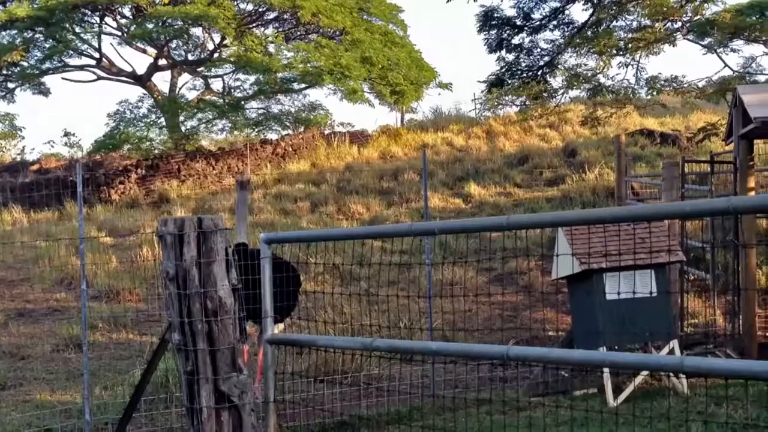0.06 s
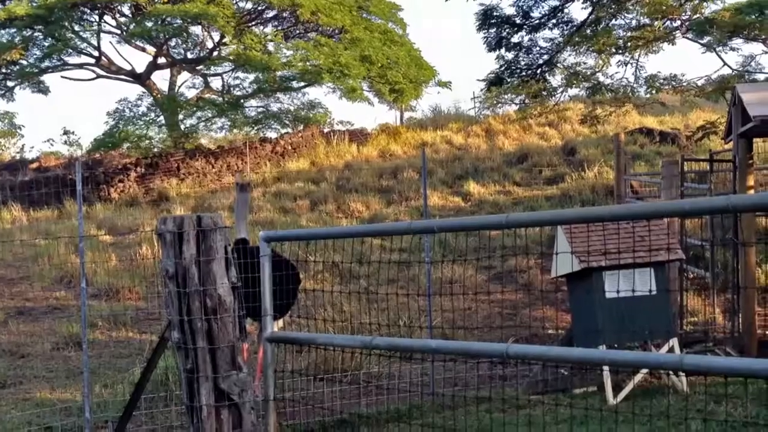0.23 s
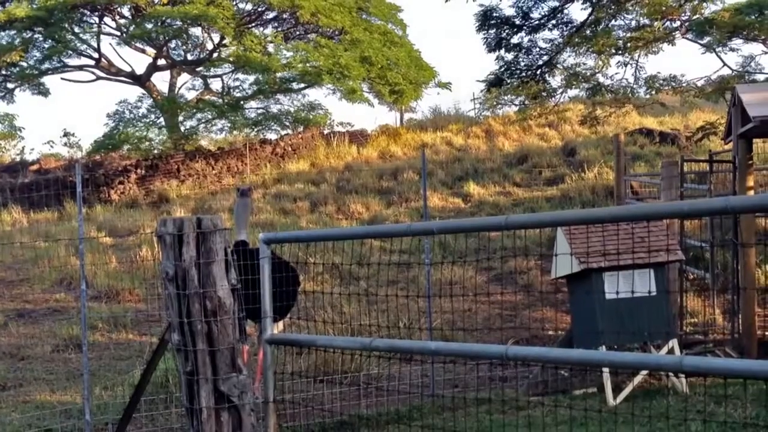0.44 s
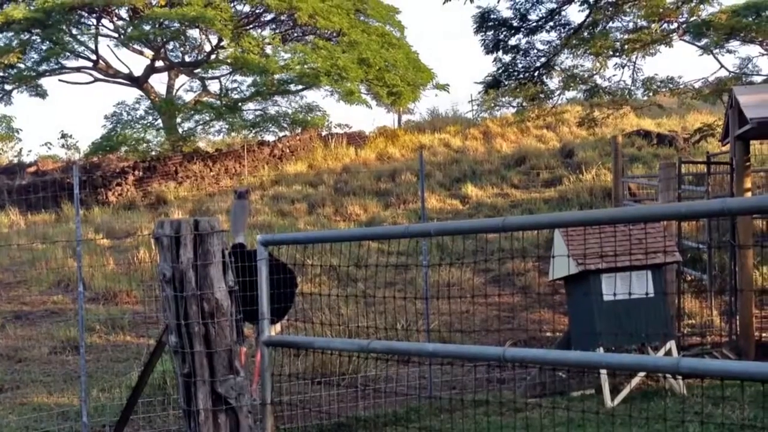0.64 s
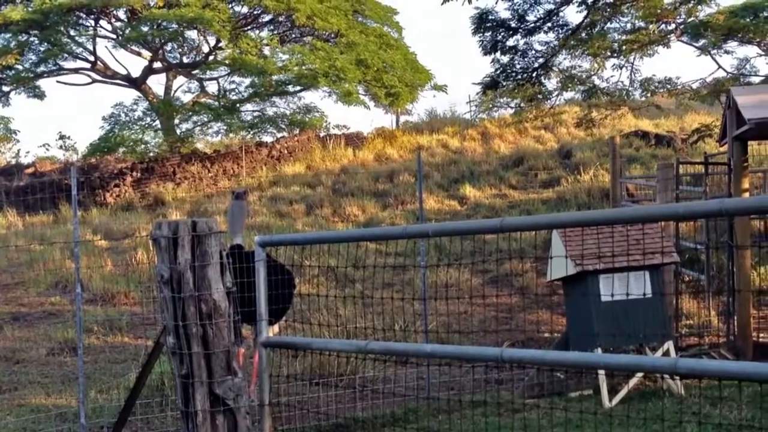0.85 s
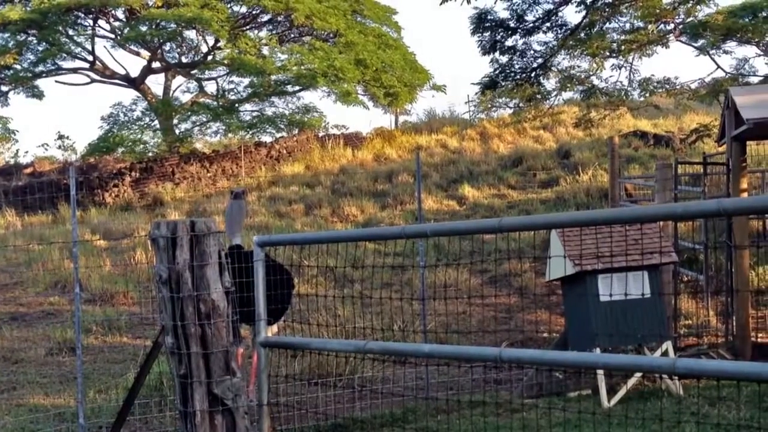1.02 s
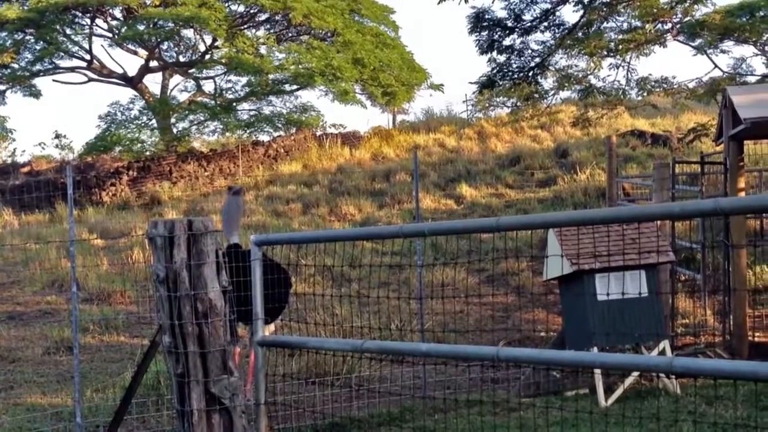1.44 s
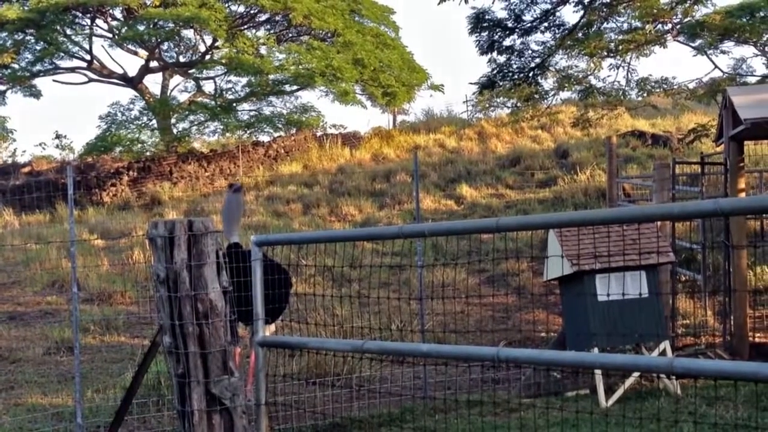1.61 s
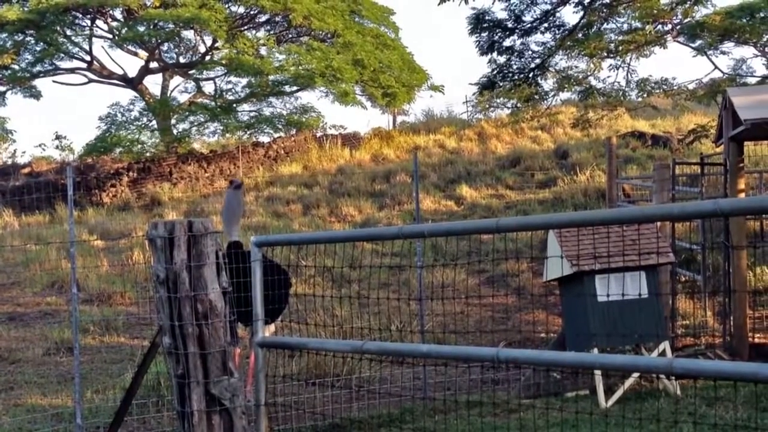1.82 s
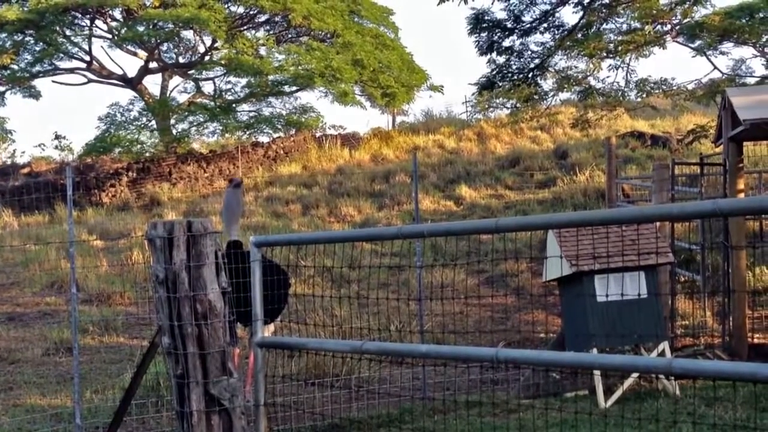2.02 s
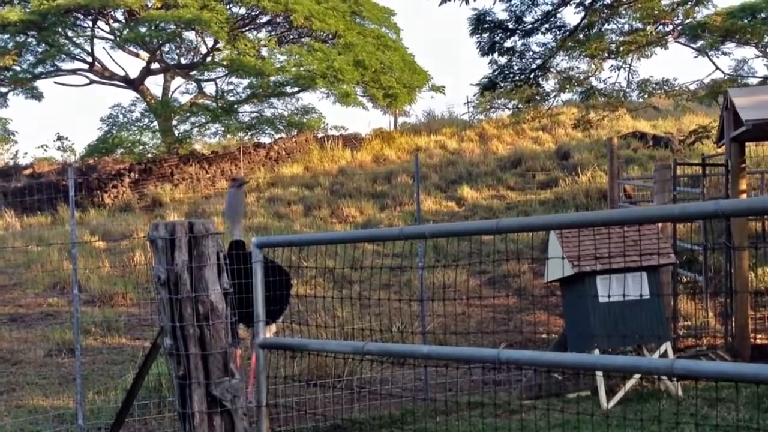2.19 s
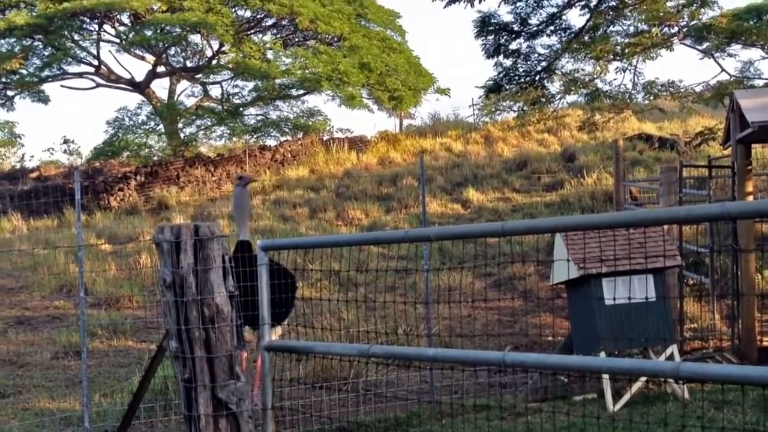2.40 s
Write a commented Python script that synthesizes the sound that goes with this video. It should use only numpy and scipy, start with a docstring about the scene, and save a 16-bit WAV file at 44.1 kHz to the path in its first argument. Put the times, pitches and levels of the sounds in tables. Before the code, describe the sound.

An ostrich gives one deep boom, swelling by 0.3 seconds, fluttering and falling in pitch, then sinking into a slow rattle from 1.1 to 1.7 seconds. A hen's reedy squawk overlaps the first 0.4 seconds. From 0.9 seconds, small birds chirp faintly far off in quiet open air. A faint low cluck at 1.7 seconds leads into a soft, rising hen call lasting until about 2.5 seconds.

```python
"""A hen ends a loud squawk as a male ostrich starts one boom behind a farm gate. His inflated neck rings
near 170 Hz while the voice under it swells, flutters and sinks into a slow rattle, whose overtones pass
through the resonance one after another. Midway, small birds begin to chip far off in the quiet air.
A short low cluck and a softer, drawn-out hen call close the scene."""
import sys
import numpy as np
from scipy import signal
from scipy.fft import rfft, irfft
from scipy.io import wavfile

SR = 44100
rng = np.random.default_rng(int(sys.argv[2]) if len(sys.argv) > 2 else 0)


def master_out(mix):
    """Clip the mix to full scale and print it as 16-bit PCM to the path in sys.argv[1]."""
    frames = np.transpose(np.atleast_2d(mix))
    ceiling = np.clip(frames, -1, 1)
    pcm = np.round(ceiling * 32767).astype(np.int16)
    wavfile.write(sys.argv[1], SR, pcm)


N = 112454


def from_db(db):
    """Decibels to gain."""
    return 10 ** (np.asarray(db) / 20)


def rms_one(x):
    """Scale to unit rms."""
    return x / np.sqrt(np.mean(x ** 2) + 1e-20)


def in_time(rows):
    """Each column of a curve at every sample."""
    time_s, *columns = np.transpose(rows)
    return [np.interp(np.arange(N) / SR, time_s, column) for column in columns]


def gain_at(spectrum, hz):
    """Gain of a spectrum at these frequencies."""
    freq_hz, db = np.transpose(spectrum)
    return from_db(np.interp(np.log(hz + 1), np.log(freq_hz), db))


def gate(rows, fade_s=0.0069):
    """Open from the first to the last point of a curve."""
    t = np.arange(N) / SR
    return np.clip(1 + np.minimum(t - rows[0][0], rows[-1][0] - t) / fade_s, 0, 1)


def drift(rate_hz):
    """Smooth random wander with a spread of 1."""
    pole = np.exp(-40 * np.pi * rate_hz / SR)  # one step every 20 samples
    slow = signal.lfilter([1], [1, -2 * pole, pole * pole], rng.standard_normal(N // 20 + 2002))[2000:]
    return np.interp(np.arange(N) / 20, np.arange(len(slow)), rms_one(slow))


def noise(spectrum):
    """Coloured noise of unit rms."""
    white = rfft(rng.standard_normal(N))
    return rms_one(irfft(white * gain_at(spectrum, np.fft.rfftfreq(N, 1 / SR)), N))


def phase_of(hz):
    """Running phase of a frequency curve."""
    return 2 * np.pi * np.cumsum(hz) / SR


def voice(hz, throat, flicker_db, harmonics, lift_db=lambda hz: 0):
    """Harmonics of a pitch, weighted by the throat as they move through it; level evened to 1."""
    phase, tone, power = phase_of(hz), 0, 0
    for k in range(1, harmonics + 1):
        gain = gain_at(throat, k * hz) * from_db(flicker_db * drift(34) + lift_db(k * hz))
        tone += gain * np.cos(k * phase + rng.uniform(0, 2 * np.pi))
        power += gain ** 2 / 2
    return tone / np.sqrt(power)


def ostrich():
    """A falling, fluttering voice rings in the inflated neck; faint overtones and turbulence ride on it."""
    # the voice from opening grunt through boom to rattle: time_s, pitch_hz
    grunt_pitch = [(0.14, 90.9), (0.192, 98.8)]
    boom_pitch = [(0.208, 156.5), (0.236, 160), (0.25, 171.7), (0.296, 184.4), (0.362, 193.4),
                  (0.426, 185.3), (0.548, 171.6), (0.64, 164.3), (0.802, 156.3), (0.902, 138.7),
                  (0.956, 129.9), (1.0, 124.7), (1.05, 109)]
    rattle_pitch = [(1.1, 104.6), (1.2, 93.9), (1.302, 81.82), (1.412, 68.9), (1.486, 62.08), (1.7, 44.47)]
    # envelopes of boom, rattle and overtones: time_s, level_db
    boom_level = [(0.13, -67), (0.16, -33.5), (0.298, -5), (0.33, -11.5), (0.52, -10.5), (0.554, -18.5),
                  (0.588, -6.5), (0.732, -6.5), (0.826, -10), (0.872, -29.5), (0.894, -19), (0.922, -33.5),
                  (1.004, -32), (1.04, -48)]
    rattle_level = [(1.07, -36.5), (1.112, -34.5), (1.134, -30), (1.24, -19.5), (1.262, -28.5),
                    (1.294, -21), (1.33, -29.5), (1.416, -36), (1.512, -27), (1.54, -42), (1.582, -35.5),
                    (1.626, -45.5), (1.676, -43.5), (1.72, -64)]
    overtone_level = [(0.15, -48), (0.26, -35.5), (0.38, -37), (0.55, -38), (0.72, -35.5), (0.9, -36),
                      (1.03, -49), (1.15, -49), (1.27, -46.5), (1.42, -50), (1.7, -72)]
    # tremolo of the voice: time_s, rate_hz, depth (0-1)
    flutter_curve = [(0.2, 43, 0.14), (0.36, 73, 0.28), (0.45, 40.6, 0.36), (0.55, 30, 0.14),
                     (0.65, 33.6, 0.27), (0.77, 66.3, 0.36), (1.0, 47, .15), (1.7, 44, 0.04)]
    # the neck's main resonance and the weaker ones that colour the overtones: freq_hz, gain_db
    neck = [(45, -61), (80, 1), (105, -16.5), (135, -7), (170, 18.5), (200, 2), (225, -7.5), (255, -51),
            (320, -61), (500, -79)]
    windpipe = [(200, -60), (225, -41), (258, 6.5), (320, 8.5), (375, -2.5), (420, -13), (490, -4.5),
                (550, -17), (630, 0.5), (740, -10), (800, -34), (890, -16), (970, -17), (1040, -23.5),
                (1130, -19), (1350, -39.5), (1750, -28), (2500, -43.5)]
    # turbulent air in the neck: freq_hz, density_db
    turbulence = [(40, -20), (80, -17.5), (120, 6), (190, 10), (260, -4.5), (400, -16), (700, -27.5),
                  (1100, -31), (1500, -46), (3000, -56.5)]
    jitter, shimmer = 0.002, 0.044
    rasp_db, rasp_follow = -28.5, 0.34  # the rasp follows a share of the envelope in dB
    neck_band_hz = [106, 229]  # the neck radiates little outside this band

    hz, = in_time([*grunt_pitch, *boom_pitch, *rattle_pitch])
    hz = hz * (1 + jitter * drift(27))
    envelope = [*boom_level, *rattle_level]
    db, = in_time(envelope)
    flutter_hz, depth = in_time(flutter_curve)
    flutter_phase = phase_of(flutter_hz * (1 + 0.06 * drift(13)))
    flutter = 1 + depth * np.sin(flutter_phase) + shimmer * drift(17)
    boom = from_db(db) * flutter * voice(hz, neck, flicker_db=0.5, harmonics=6)
    boom = signal.sosfiltfilt(signal.butter(4, neck_band_hz, "band", fs=SR, output="sos"), boom)
    overtones = from_db(in_time(overtone_level)[0]) * voice(hz, windpipe, flicker_db=1.2, harmonics=12)
    rasp = noise(turbulence) * from_db(rasp_db + rasp_follow * db)
    return gate(envelope, fade_s=0.032) * (boom + overtones + rasp)


def hen(call, throat, lift_db=lambda hz: 0):
    """A reedy tone that cracks now and then, with a puff of rasp on every cycle."""
    # voice cracks, strong and weak cycles alternating: centre_s, length_s, depth (0-1)
    cracks = [(0.267, .04, .2), (2.324, 0.014, .55), (2.358, 0.023, 0.64)]
    # rasp against the tone: time_s, level_db
    hoarseness = [(0, -9), (0.015, -10), (0.03, -24), (0.15, -25), (0.18, -18), (0.21, -25), (0.275, -17),
                  (0.32, -23), (0.36, -22), (1.85, -26), (2.0, -28), (2.25, -24), (2.33, -26), (2.5, -26)]
    # colour of the throat's rasp: freq_hz, density_db
    rasp_colour = [(250, -23.5), (500, -11), (800, -6), (1150, 9), (1600, -5.5), (2000, -19), (2500, -30.5),
                   (2950, 1.5), (3450, 2.5), (4200, -12.5), (5000, -25), (5700, -19), (6800, -10.5),
                   (8000, -36.5), (10000, -26.5), (13000, -44)]
    jitter, shimmer = 0.0035, 0.06

    hz, db = in_time(call)
    hz = hz * (1 + jitter * drift(61))
    t, phase = np.arange(N) / SR, phase_of(hz)
    crack = sum(depth * np.exp(-(2 * (t - centre_s) / length_s) ** 2)
                for centre_s, length_s, depth in cracks)
    tone = voice(hz, throat, flicker_db=2.38, harmonics=19, lift_db=lift_db)
    tone = tone * (1 + shimmer * drift(32) + crack * np.cos(phase / 2))
    rasp = from_db(in_time(hoarseness)[0]) * noise(rasp_colour) * (1 + np.cos(phase))
    cry = gate(call) * from_db(db) * (tone + rasp)
    return signal.sosfilt(signal.butter(4, 300, "high", fs=SR, output="sos"), cry)


def squawk():
    """A loud open-beaked cry whose resonances swell in turn as the beak moves."""
    # contour of the cry: time_s, pitch_hz, level_db
    call = [(0.0, 562, -24.5), (0.062, 577, -26), (0.1, 558.5, -25), (0.122, 558.3, -25.5),
            (0.17, 593.6, -22), (0.18, 602, -23.5), (0.19, 575, -25), (0.212, 593.7, -20.5),
            (0.226, 574.8, -24.5), (0.26, 584.2, -25), (0.318, 572.2, -29), (0.364, 531.6, -28),
            (0.376, 514, -54)]
    # throat with the beak open: freq_hz, gain_db
    open_throat = [(570, -8), (1150, 1.5), (1730, -9.5), (2300, -22), (2900, -17), (3450, -4),
                   (4030, -29.5), (4600, -20.5), (5180, -33), (5750, -14.5), (6330, -39.5), (6900, -26),
                   (7600, -41), (10500, -47.5), (13000, -66.5)]
    # swell of two resonances: time_s, lower_db, upper_db
    swells = [(0.01, 1.5, -3.5), (0.06, -4.5, 12), (0.11, 0, -4.5), (0.15, 3, 2), (0.2, 4.5, -4),
              (0.25, 2, -2), (0.31, -4.5, 5), (0.37, -7, -2.5)]
    lower_db, upper_db = in_time(swells)
    lower_hz, upper_hz, width_hz = 1167, 1830, 300
    bell = lambda hz, centre_hz: np.exp(-((hz - centre_hz) / width_hz) ** 2)
    return hen(call, open_throat, lambda hz: lower_db * bell(hz, lower_hz) + upper_db * bell(hz, upper_hz))


def drawl():
    """A soft rising hen call that starts reedy and ends mellow."""
    # contour of the call: time_s, pitch_hz, level_db
    call = [(1.79, 378.8, -55), (1.82, 374, -53), (1.842, 347, -41.5), (1.87, 426, -50),
            (1.894, 367.4, -43), (1.93, 371, -46), (1.954, 447.5, -38.5), (2.018, 433.6, -41.5),
            (2.042, 453.5, -38), (2.156, 454, -39), (2.2, 466.7, -32.5), (2.214, 459.8, -36),
            (2.278, 495.5, -35), (2.362, 479.5, -36.5), (2.39, 461, -37.5), (2.44, 476.2, -35.5),
            (2.52, 483.7, -33.5), (2.55, 470.0, -39)]
    # throat with the beak nearly shut: freq_hz, gain_db
    shut_throat = [(370, 11), (470, 0.5), (750, 5), (950, 3.5), (1100, 5), (1400, -9), (1850, -15.5),
                   (2350, -31), (2800, -18), (3080, -28), (3300, -17), (3540, -13), (3750, -26),
                   (4200, -29), (6000, -42)]
    # treble shelf: time_s, gain_db
    treble = [(1.9, -12), (1.96, 4.5), (2.06, 5), (2.15, 3), (2.26, 8.5), (2.32, -18), (2.55, -14)]
    treble_db, = in_time(treble)
    shelf_hz = 3230
    return hen(call, shut_throat, lambda hz: treble_db / (1 + (shelf_hz / hz) ** 20))


def cluck():
    """A short low note from the hen's throat."""
    # contour of the note: time_s, pitch_hz, level_db
    call = [(1.725, 247.3, -89), (1.742, 254, -44.5), (1.77, 273.3, -65)]
    # dark throat colour: freq_hz, gain_db
    throat = [(250, -10), (510, 2), (770, 4.5), (1030, 1), (1300, -27), (2500, -39)]
    return hen(call, throat)


def small_birds():
    """Each chip is a slightly buzzy whistle sliding quickly down."""
    # distant chips: start_s, length_s, from_hz, to_hz, level_db
    chips = [(0.891, 0.013, 6300, 4200, -46), (1.281, 0.024, 6200, 3800, -47),
             (1.579, 0.042, 5350, 4470, -54), (1.618, 0.046, 6130, 5260, -53.5),
             (1.85, .042, 6700, 3900, -53), (1.988, 0.057, 5640, 4300, -51),
             (2.363, 0.042, 5800, 4680, -51), (2.48, 0.073, 5300, 4150, -49.5)]
    t, birds = np.arange(N) / SR, np.zeros(N)
    warble = 1 + 0.035 * drift(350)
    for start_s, length_s, from_hz, to_hz, level_db in chips:
        progress = np.clip((t - start_s) / length_s, 0, 1)
        envelope = np.sqrt(np.abs(np.sin(np.pi * progress)))
        hz = warble * from_hz * (to_hz / from_hz) ** progress
        birds += from_db(level_db) * envelope * np.sin(phase_of(hz))
    return birds


def yard(sound, t60_s, predelay_s=0.0087):
    """Dying scatter from fence, shed and trees."""
    t = np.arange(SR // 2) / SR
    tail = rng.standard_normal(len(t)) * from_db(-60 * t / t60_s) * (t > predelay_s)
    return signal.fftconvolve(sound, tail / np.sqrt(np.sum(tail ** 2)))[:N]


def open_air():
    """A steady bed of air and leaves."""
    # colour of the bed: freq_hz, density_db
    air_colour = [(25, -36.5), (60, -27), (120, -2.5), (450, -1.5), (750, -7.5), (1000, -4), (1400, -12),
                  (2100, -12), (3200, -10), (4400, -9), (7000, -14), (15000, -16)]
    return noise(air_colour)


def scene():
    """Ostrich, hens and far birds over the open air, in mono."""
    hens = from_db(-1) * squawk() + cluck() + from_db(-0.5) * drawl()
    chips = small_birds()
    scatter = from_db(-10) * yard(hens, t60_s=0.15) + from_db(-9) * yard(chips, t60_s=0.12)
    return (ostrich() + hens + from_db(-5) * chips + scatter + from_db(-52.5) * open_air())[None]


def record(dry):
    """A steep low-pass takes off the very top."""
    cutoff_hz = 15100
    return signal.sosfilt(signal.ellip(12, 0.1, 80, cutoff_hz, fs=SR, output="sos"), dry)


dry = scene()
out = record(dry)
master_out(out)
```